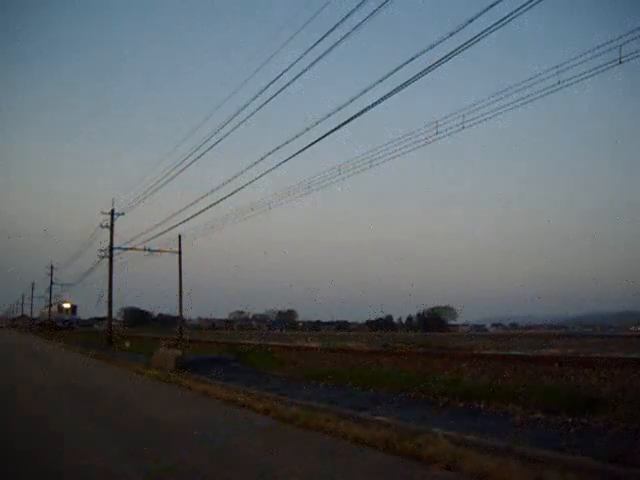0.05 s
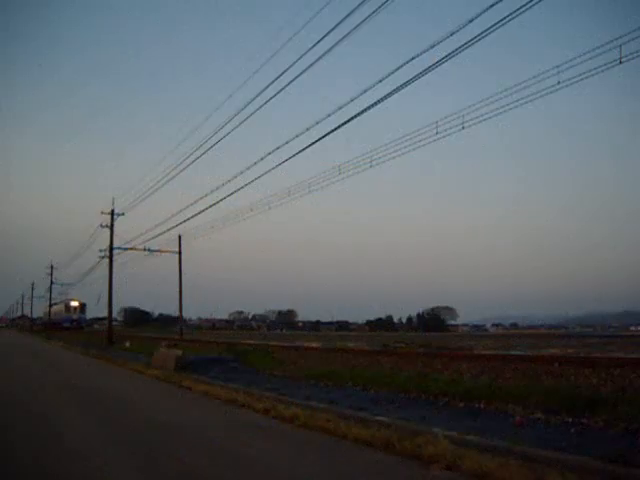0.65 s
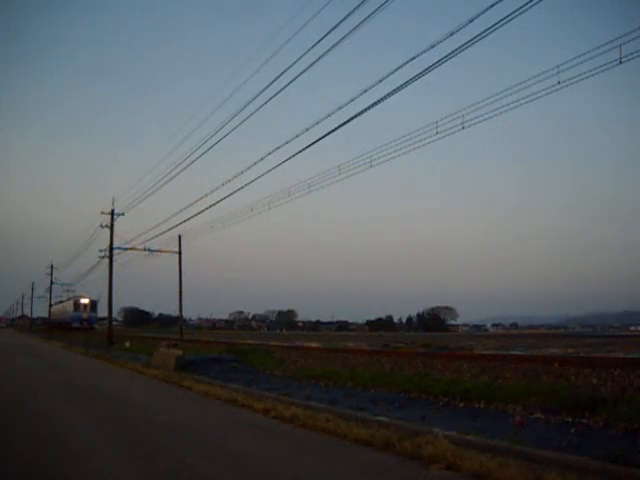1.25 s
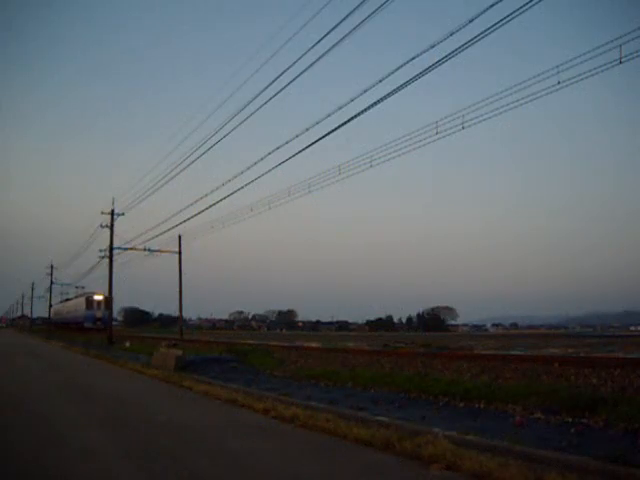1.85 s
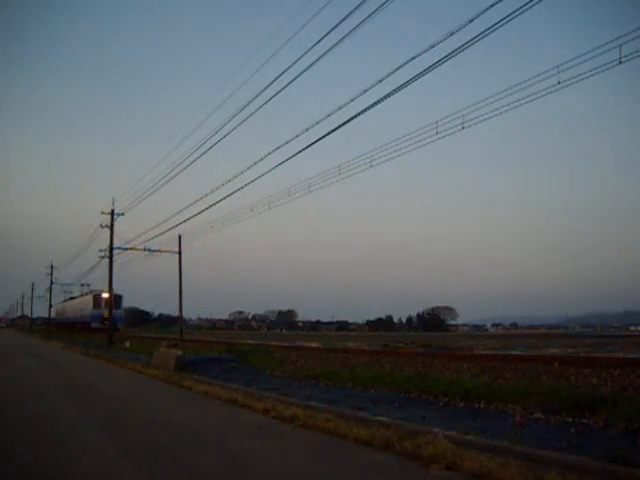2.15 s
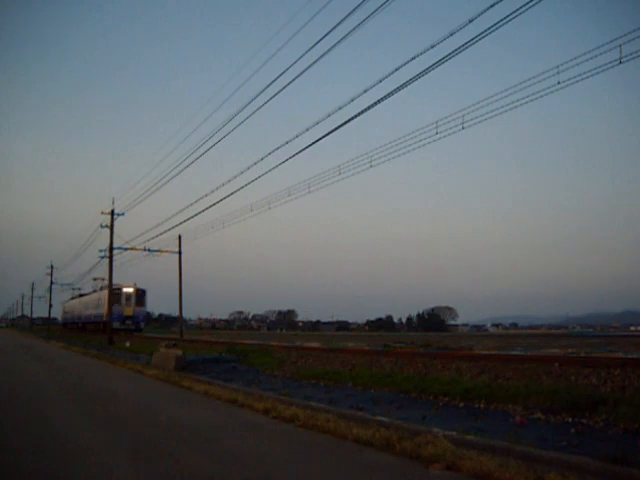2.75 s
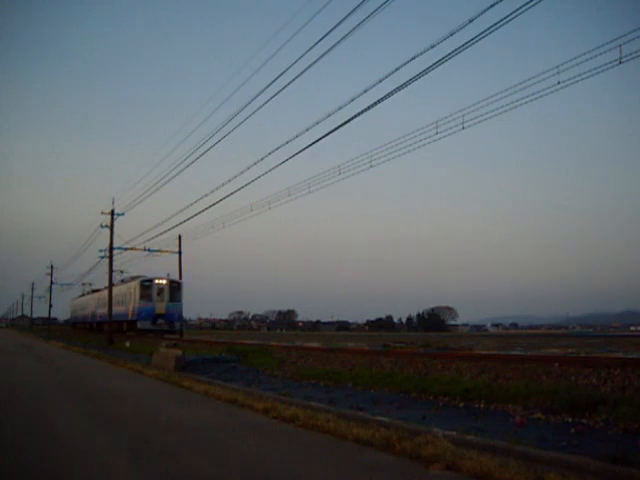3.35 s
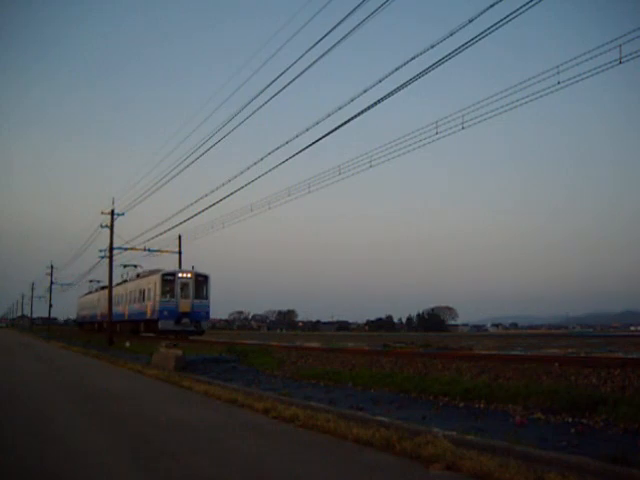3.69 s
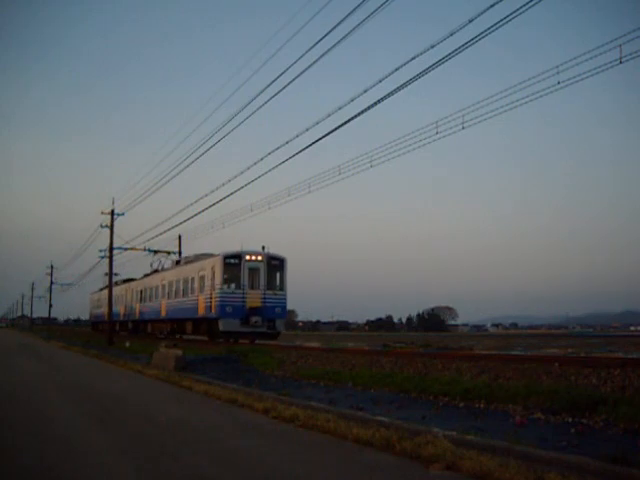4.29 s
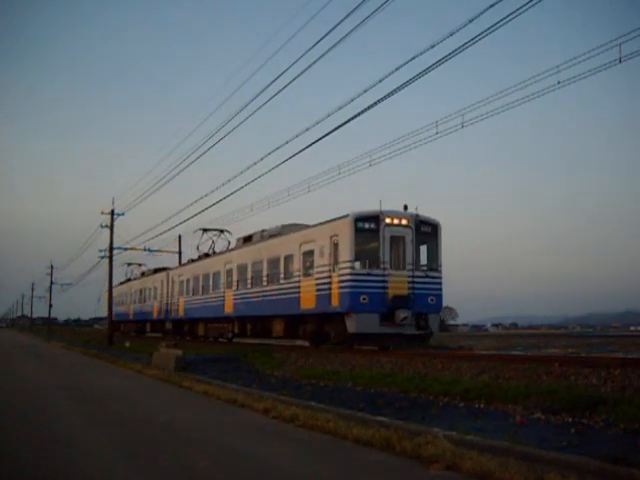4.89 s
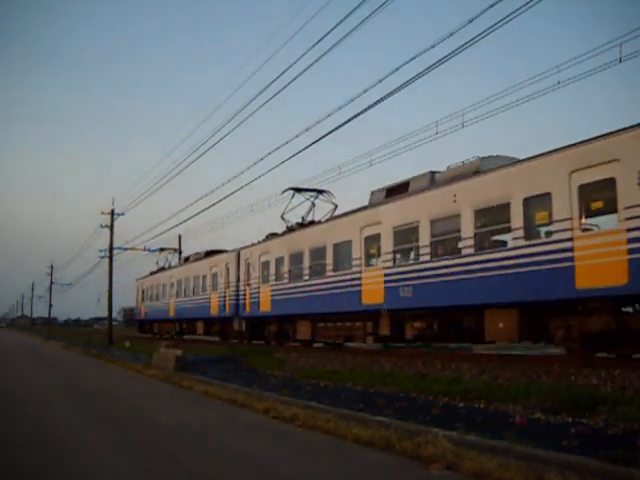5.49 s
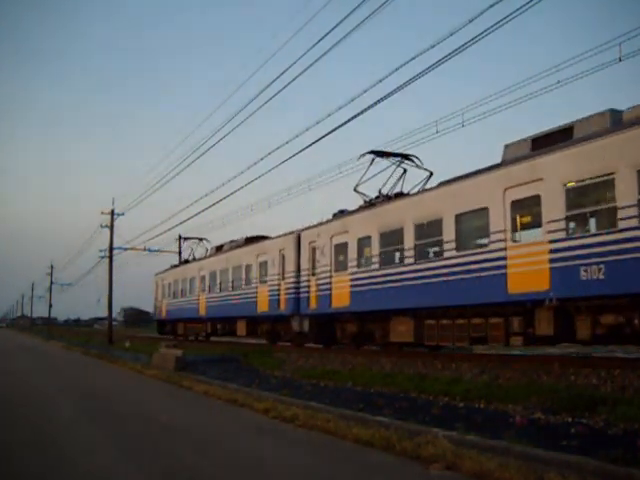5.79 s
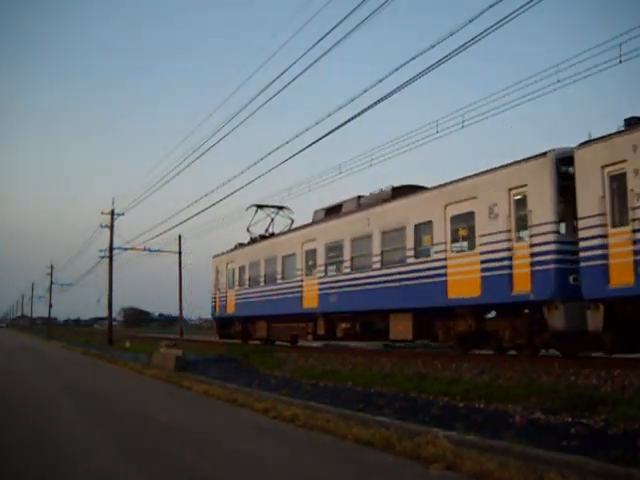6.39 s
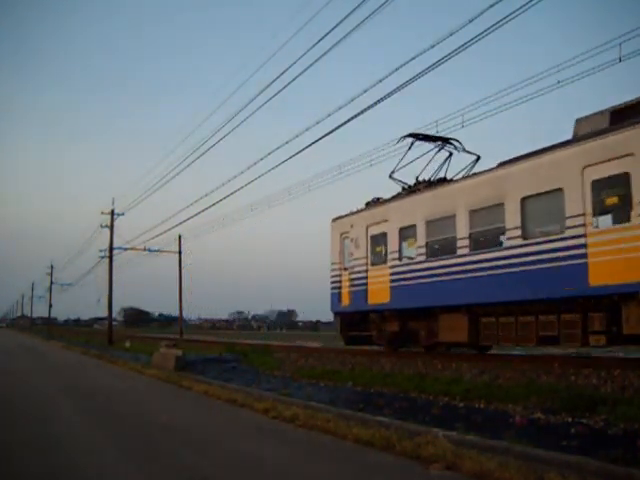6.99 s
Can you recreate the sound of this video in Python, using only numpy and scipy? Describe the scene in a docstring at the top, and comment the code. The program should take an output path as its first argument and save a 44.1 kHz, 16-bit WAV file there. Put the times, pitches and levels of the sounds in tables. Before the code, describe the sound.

After a very brief rumble, a two-car electric train is heard far off across open country, with thin singing in the rails and faint clacks. It grows steadily into a close roar with a low boom and humming motors, and the wheels bang over the joints as the cars go by. The trackside microphone sounds muffled, catches light wind and distorts a little on the hardest hits.

```python
"""Open fields, a few metres from a single track: a two-car electric train comes from far off and passes.
A breeze buffets the microphone, and a brief rumble opens the scene. The rails sing ahead of the train,
and blows up the line race through the steel as short falling chirps. The motors hum, the car bodies boom,
the wheels roar and hiss on the rails and knock in pairs over the joints. The microphone passes nothing
above 4 kHz and overloads on the nearest knocks."""
import sys
import numpy as np
from scipy import signal
from scipy.fft import rfft, irfft
from scipy.io import wavfile
from scipy.ndimage import uniform_filter1d

SR = 44100
rng = np.random.default_rng(int(sys.argv[2]) if len(sys.argv) > 2 else 0)


def wav_out(sig):
    """Save sig, one row per channel (or a flat mono array), as 16-bit PCM at SR to the path in sys.argv[1]."""
    wavfile.write(sys.argv[1], SR, np.round(np.clip(np.atleast_2d(sig).T, -1, 1) * 32767).astype(np.int16))


N = 310464
TIME = np.arange(N) / SR
START_SPEED_M_PER_S, ACCELERATION_M_PER_S2 = 17.54, 0.137
ABREAST_S, TRACK_DISTANCE_M = 5.87, 6.5  # when the first bogie draws level, and how far away it passes

# Tone of the breeze on the microphone: frequency_hz, relative_db
WIND_SPECTRUM = [(5, -3.5), (20, 3.5), (35, 0), (55, -4), (85, -6.5), (130, -15), (300, -42.5), (1000, -78)]
# Tone of the opening rumble: frequency_hz, relative_db
RUMBLE_SPECTRUM = [(30, 9), (62, -9), (130, 5.5), (190, -3), (390, -1.5), (640, -7), (830, -4.5),
                   (1100, -19.5), (1600, -25.5), (2400, -25), (3900, -29)]
# Faint whines of the distant train: pitch_hz, level_db
WHINE_TONES = [(712, -62), (760, -55.5)]
# Envelope of the rails' high singing: time_s, level_db
SINGING_ENVELOPE = [(0, -56), (.4, -59), (.65, -65.5), (.95, -56), (1.5, -58), (2.1, -60.5), (3.5, -57.5),
                    (5, -68), (7.04, -73)]

# Swell of the body boom as the train nears: abreast_db, falloff_exponent, far_db
BOOM_SWELL = (-36.5, 0.8, -64)
# Swell of the hum's fundamental: abreast_db, falloff_exponent, far_db
HUM_SWELL = (-29.5, 1.15, -53.5)
# Swell of the wheel roar: abreast_db, falloff_exponent, far_db
ROAR_SWELL = (-22.1, 1.0, -46.8)
# Swell of the wheel hiss: abreast_db, falloff_exponent, far_db
HISS_SWELL = (-32.5, 0.74, -55.6)

# Fundamental of the motor hum, sinking as the cars go by: time_s, pitch_hz
HUM_GLIDE = [(0, 142), (2, 142.3), (3.3, 143.7), (4.7, 143.9), (5.4, 144), (5.9, 142.5), (6.5, 141),
             (7.04, 139)]
# Envelope of the hum's second harmonic: time_s, relative_db
HUM_SECOND_ENVELOPE = [(0, -44), (1.3, -47), (2, -45), (2.75, -53), (3.25, -36), (3.8, -39.5), (4.4, -46),
                       (4.8, -37), (5.3, -46), (5.55, -20), (6.2, -27), (6.7, -25.5), (7.04, -18)]
# Envelope of the hum's third harmonic: time_s, relative_db
HUM_THIRD_ENVELOPE = [(0, -58), (2, -53), (2.5, -43.5), (3.2, -44), (3.65, -35.5), (4, -45), (4.4, -35.5),
                      (4.8, -35), (5.2, -28.5), (5.55, -22), (5.9, -31), (6.4, -24.5), (7.04, -27)]
# Weak overtones, set against the mean of the second and third: harmonic_number, offset_db
HUM_OVERTONES = [(4, -19), (5, -14.5)]
# Tone of the wheel roar, far off and alongside: frequency_hz, far_relative_db, near_relative_db
ROAR_SPECTRA = [(30, -12, -12), (68, 0, 2.5), (95, -4, -4.5), (180, -4, -6), (254, 4, 3), (396, 1.5, 0),
                (480, 2.5, -3), (664, -7.5, 0), (774, 1.5, 0), (904, -15, -0.5), (974, -8, -1),
                (1189, -21.5, -8.5), (1690, -21.5, -22), (2430, -43.5, -42.5)]
# Tone of the wheel hiss, far off and alongside: frequency_hz, far_relative_db, near_relative_db
HISS_SPECTRA = [(900, -29.5, -36), (1736, -8, -11.5), (1924, 1, -0.5), (2220, 1, 5), (2500, -1.5, 0),
                (2760, -2.5, 4), (3220, 1, -4), (3230, -6.5, -5.5), (3490, -1, -3.5), (4010, -15, -0.5)]

# The four two-axle bogies: behind_first_m
BOGIE_OFFSETS = [0, 13.87, 20.04, 33.7]
# Rail joints, farthest first; the train shades its later bogies, and each chirp leads its knock:
# first_knock_s, thud_db, clang_db, wheel_db, second_axle_db, shade_db, chirp_db, chirp_lead_s
RAIL_JOINTS = [(-1.23, -41, -35, -47, -3, -10, -65, 0.33), (0.155, -38.5, -36, -48, -7, -13, -46, 0.263),
               (1.529, -37, -31, -40, -5, -17, -48, 0.205),
               (2.889, -33.5, -34.5, -43, -2.5, -6, -45.5, 0.132),
               (4.243, -23.5, -28.5, -36.5, 2, 0, -32.5, 0.056), (5.589, -23, -9, -23, -2.8, 0, -45, 0)]
# Heavier thumps from one bogie alongside: start_s, thud_db, clang_db, wheel_db
HEAVY_THUMPS = [(6.427, -15, -13.5, -35), (6.55, -13, -10.5, -28.5)]
# Resonances in the thud of the track: pitch_hz, width_hz, gain_db
TRACK_MODES = [(221, 100, -6.5), (256, 90, 2)]
# Resonances in the clang of a bogie: pitch_hz, width_hz, gain_db
BOGIE_MODES = [(435, 89, 12), (581, 210, 5.5), (726, 80, 0.5), (920, 40, -22.5)]
# Resonances in the ring of a wheel: pitch_hz, width_hz, gain_db
WHEEL_RING_MODES = [(1370, 440, -27.5), (2130, 130, 14), (2630, 650, 16), (3260, 1200, 14),
                    (3380, 650, -23.5)]


def amp(db):
    """Decibels to gain."""
    return 10 ** (np.asarray(db) / 20)


def unit(x):
    """Scales to rms 1."""
    return x / np.sqrt(np.mean(abs(x) ** 2) + 1e-20)


def unit_attack(hit):
    """Scales a hit to rms 1 over its first 36 ms."""
    return hit / np.sqrt(np.mean(hit[:SR // 28] ** 2))


def automation(points):
    """Straight ramps between (time_s, value) points, one value a sample."""
    return np.interp(TIME, *np.transpose(points))


def shaped_noises(spectra):
    """One white noise through each EQ curve of a table, each at rms 1."""
    hz, *curves_db = np.transpose(spectra)
    log_hz = np.log(np.fft.rfftfreq(N, 1 / SR) + 1)
    white = rfft(rng.standard_normal(N))
    gains = [amp(np.interp(log_hz, np.log(hz), db, right=-70)) for db in curves_db]
    return [unit(irfft(white * gain, N)) for gain in gains]


def drift(rate_hz):
    """Smooth random modulation of rms 1, rolling off above the given rate."""
    hop = 64
    steps = TIME[::hop]
    rolloff = np.exp(-(np.fft.rfftfreq(len(steps), hop / SR) / rate_hz) ** 2)
    slow = irfft(rfft(rng.standard_normal(len(steps))) * rolloff, len(steps))
    return unit(np.interp(TIME, steps, slow))


def ring(x, modes):
    """Drives a bank of damped resonances."""
    return sum(amp(db) * signal.lfilter(*signal.iirpeak(hz, hz / width_hz, fs=SR), x)
               for hz, width_hz, db in modes)


def resonant_noise(hz, width_hz):
    """Noise sent twice through one resonance, at rms 1."""
    mode = [(hz, width_hz, 0)]
    return unit(ring(ring(rng.standard_normal(N), mode), mode))


def low_pass(x, hz):
    """A steep treble cut."""
    return signal.oaconvolve(x, signal.firwin(401, hz, window=("kaiser", 9), fs=SR), "same")


def saturate(x, ceiling, knee):
    """Flattens peaks toward the ceiling; a larger knee is a harder corner."""
    return x / (1 + abs(x / ceiling) ** knee) ** (1 / knee)


def proximity():
    """The bogies' inverse-square shares, summed: 1 equals a single bogie abreast of the microphone."""
    mean_speed = START_SPEED_M_PER_S + ACCELERATION_M_PER_S2 * (TIME + ABREAST_S) / 2
    front_m = mean_speed * (TIME - ABREAST_S)
    return sum(TRACK_DISTANCE_M ** 2 / (TRACK_DISTANCE_M ** 2 + (front_m - behind_m) ** 2)
               for behind_m in BOGIE_OFFSETS)


def near_mix(floor=0.07):
    """Share of close-up tone: near the floor far off, up to 1 with the cars alongside."""
    return np.clip(floor + proximity(), 0, 1)


def swell(abreast_db, falloff_exponent, far_db):
    """Gain that rises out of what the rails carry from afar as the bogies come near."""
    return np.hypot(amp(abreast_db) * proximity() ** falloff_exponent, amp(far_db))


def breeze(level_db=-39.0, gust_db=.8):
    """Moving air buffets the microphone: a low, fairly even bed."""
    return amp(level_db + gust_db * drift(5)) * shaped_noises(WIND_SPECTRUM)[0]


def opening_rumble(level_db=-30, stop_s=0.168, fade_s=0.008):
    """A brief rumble that stops short."""
    gate = np.clip((stop_s - TIME) / fade_s + .5, 0, 1)
    return amp(level_db) * gate * shaped_noises(RUMBLE_SPECTRUM)[0]


def distant_whine(waver=0.0024, fading_db=4):
    """Thin tones that come and go, audible while the train is still far off."""
    out = np.zeros(N)
    for hz, db in WHINE_TONES:
        cycles = np.cumsum(hz * (1 + waver * drift(9.1))) / SR
        out += amp(db) * unit(np.sin(2 * np.pi * cycles) * amp(fading_db * drift(16)))
    return out


def rail_singing(flutter_db=6.5):
    """The rails carry three high resonances far ahead of the wheels, each fluttering by itself."""
    bands = sum(resonant_noise(hz, width_hz=330) * amp(flutter_db * drift(17))
                for hz in (3020, 3280, 3560))
    return amp(automation(SINGING_ENVELOPE)) * unit(bands)


def body_boom():
    """Rough running shakes the car bodies at one low resonance."""
    return swell(*BOOM_SWELL) * resonant_noise(hz=67, width_hz=20)


def motor_hum(waver=.0045, beat_depth=.65, beat_hz=11, trim_db=-0.6):
    """Harmonics of the traction motors; several motors and paths beat, so each one swells and fades."""
    cycles = np.cumsum(automation(HUM_GLIDE) * (1 + waver * drift(3.84))) / SR
    second_db, third_db = automation(HUM_SECOND_ENVELOPE), automation(HUM_THIRD_ENVELOPE)
    strong = [(1, swell(*HUM_SWELL)), (2, amp(second_db)), (3, amp(third_db))]
    weak = [(harmonic, amp((second_db + third_db) / 2 + db)) for harmonic, db in HUM_OVERTONES]
    out = np.zeros(N)
    for harmonic, gain in strong + weak:
        beating = 1 + beat_depth * (drift(beat_hz) + 1j * drift(beat_hz))
        tone = np.exp(2j * np.pi * (harmonic * cycles + rng.random()))
        out += gain * unit((beating * tone).real)
    return amp(trim_db) * out


def rail_chirps(cues, start_hz=1500, fall_s=.02, peak_s=.015, chatter_s=0.012, rattle_depth=.5):
    """Bending waves in the rail: treble travels fastest, smearing each blow into a falling chirp."""
    out, t = np.zeros(N + SR), np.arange(SR // 10) / SR
    cycles = np.cumsum(start_hz / np.sqrt(1 + 2 * t / fall_s)) / SR
    envelope = (t / peak_s * np.exp(1 - t / peak_s)) ** 2
    for start_s, db in cues:
        detune = rng.uniform(.88, 1.12, (3, 1))  # three kinds of wave, each at its own speed
        sweep = envelope * np.sin(2 * np.pi * detune * cycles).sum(0)
        chatter = rng.standard_normal(len(t)) * np.exp(-t / chatter_s)
        chirp = signal.fftconvolve(chatter, sweep)
        fastener_rattle = unit(uniform_filter1d(rng.standard_normal(len(chirp)), size=120))
        chirp *= 1 + rattle_depth * fastener_rattle
        at = round(start_s * SR)
        out[at:at + len(chirp)] += amp(db) * unit_attack(chirp)
    return out[:N]


def approaching_noise(spectra, far_db, near_db):
    """Crossfades from far to close-up tone: grass soaks up the mids until the train is near."""
    near = near_mix()
    distant, close = shaped_noises(spectra)
    return (1 - near) * amp(far_db) * distant + near * amp(near_db) * close


def rolling_wheels(roar_flutter_db=1.475, hiss_flutter_db=0.74, rough_spots_db=1.03):
    """Rough steel rolls on steel: a roar with a hiss on top."""
    roar = approaching_noise(ROAR_SPECTRA, far_db=4, near_db=3.0)
    hiss = approaching_noise(HISS_SPECTRA, far_db=-1.37, near_db=0.27)
    air_flutter_db = roar_flutter_db * (1 - near_mix())  # moving air makes far sound flutter more
    roar *= swell(*ROAR_SWELL) * amp(air_flutter_db * drift(30))
    hiss *= swell(*HISS_SWELL) * amp(hiss_flutter_db * drift(6.7))
    return (roar + hiss) * amp(rough_spots_db * drift(25))  # rough spots shake track and wheel together


def blow(modes, top_hz, decay_s, tail_db, tail_s, rise_s=0.00033):
    """One hit: a burst of contact chatter and a weaker rattling tail ring the modes."""
    t = np.arange(SR // 4) / SR
    attack = 1 - np.exp(-t / rise_s)
    decay = np.exp(-t / decay_s) + amp(tail_db) * np.exp(-t / tail_s)
    ringing = ring(attack * decay * rng.standard_normal(len(t)), modes)
    band = signal.butter(4, [modes[0][0] / 2, top_hz], "band", fs=SR, output="sos")
    return unit_attack(signal.sosfilt(band, ringing))


def joint_cues(wheelbase_m=2.16, second_car_db=-2.5, clang_shade_share=0.55, chirp_db_per_bogie=-6):
    """Axles meet joints: cues for knocks (start_s, thud_db, clang_db, wheel_db) and chirps (start_s, db)."""
    knocks, chirps, near = [], [], near_mix()
    for first_s, thud_db, clang_db, wheel_db, second_axle_db, shade_db, chirp_db, lead_s in RAIL_JOINTS:
        speed = START_SPEED_M_PER_S + ACCELERATION_M_PER_S2 * first_s
        far = 1 - np.interp(first_s, TIME, near)
        for bogie, behind_m in enumerate(BOGIE_OFFSETS):
            shaded_db = shade_db if bogie else 0
            car_db = far * second_car_db * (bogie // 2)  # the second car is softer on far joints
            for axle_m, axle_db in ((0, 0), (wheelbase_m, second_axle_db)):
                start_s = first_s + (behind_m + axle_m) / speed
                knocks.append((start_s, thud_db + car_db,
                               clang_db + car_db + axle_db + clang_shade_share * shaded_db,
                               wheel_db + car_db + axle_db + shaded_db))
                chirps.append((start_s - lead_s, chirp_db + chirp_db_per_bogie * bogie))
    return [[cue for cue in cues if 0 <= cue[0] < N / SR] for cues in (knocks, chirps)]


def joint_knocks(cues, near_tilt_db_per_octave=5, near_clang_db=4.0, near_wheel_db=5, near_tail_db=3):
    """An axle drops into the gap: track thuds, bogie clangs, wheel rings; brighter and looser up close."""
    out, closeness = np.zeros(N + SR), near_mix() ** 2
    for start_s, thud_db, clang_db, wheel_db in cues:
        at = round(start_s * SR)
        near = closeness[at]
        tilt, tail_lift_db = near * near_tilt_db_per_octave, near * near_tail_db
        bogie = [(hz, width_hz, db + tilt * np.log2(hz / BOGIE_MODES[0][0]))
                 for hz, width_hz, db in BOGIE_MODES]
        thud = blow(TRACK_MODES, top_hz=487, decay_s=0.0089, tail_db=-9.5, tail_s=.06, rise_s=0.0025)
        clang = blow(bogie, top_hz=1050 + 500 * near, decay_s=.021,
                     tail_db=-11.5 + tail_lift_db, tail_s=0.037)
        wheel = blow(WHEEL_RING_MODES, top_hz=5200, decay_s=.021,
                     tail_db=-16 + tail_lift_db, tail_s=0.098, rise_s=0.0044)
        knock = amp(thud_db) * thud
        knock += amp(clang_db + near * near_clang_db) * clang
        knock += amp(wheel_db + near * near_wheel_db) * wheel
        out[at:at + len(knock)] += knock
    return out[:N]


def scene():
    """The train over the breeze and the opening rumble, in mono."""
    knocks, chirps = joint_cues()
    running = rolling_wheels() + body_boom() + rail_singing() + motor_hum() + distant_whine()
    hits = joint_knocks(knocks + HEAVY_THUMPS) + rail_chirps(chirps)
    return (running + hits + opening_rumble() + breeze())[None]


def record(dry):
    """A narrow-band microphone chain: the input overloads, and its filter's overshoots clip at the output."""
    overloaded = saturate(dry[0], ceiling=.585, knee=4.5)
    narrow = low_pass(overloaded, hz=3828)
    clipped = saturate(narrow, ceiling=.51, knee=60)
    return low_pass(clipped, hz=15830)[None]


dry = scene()
out = record(dry)
wav_out(out)
```